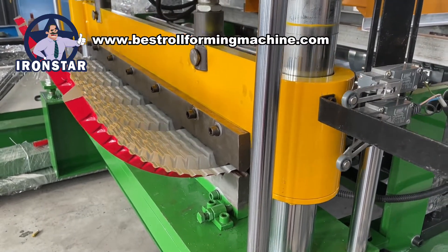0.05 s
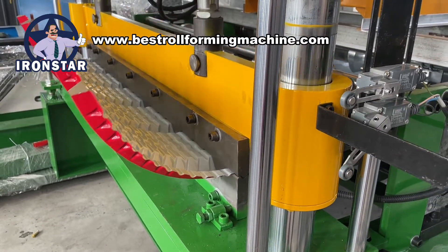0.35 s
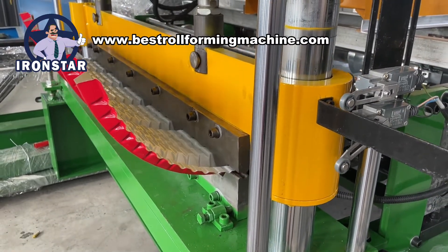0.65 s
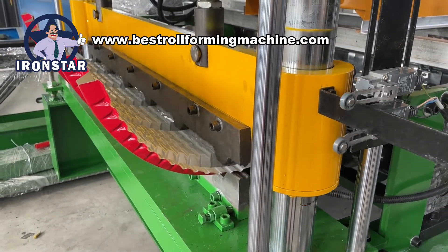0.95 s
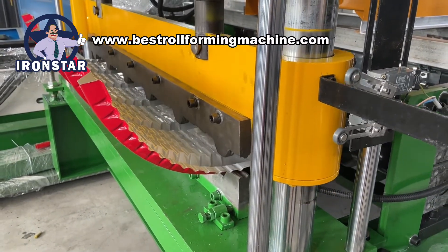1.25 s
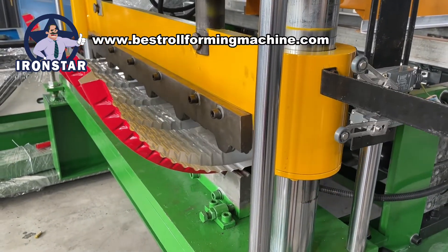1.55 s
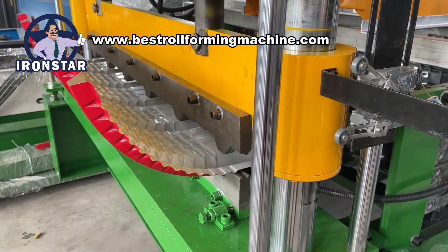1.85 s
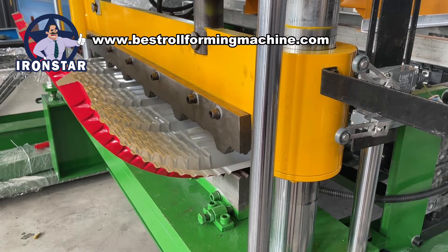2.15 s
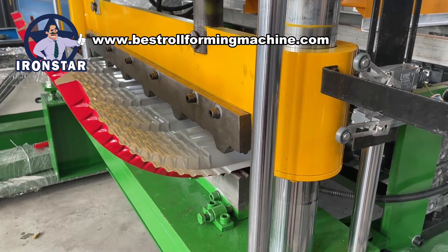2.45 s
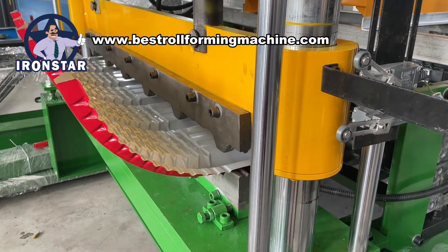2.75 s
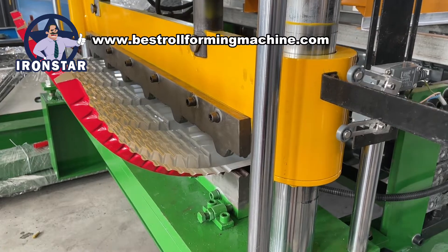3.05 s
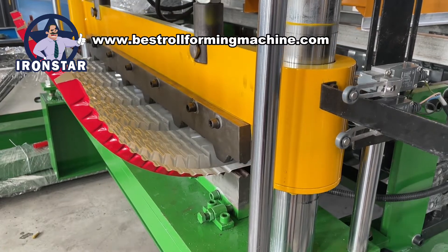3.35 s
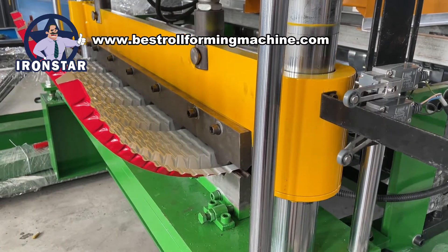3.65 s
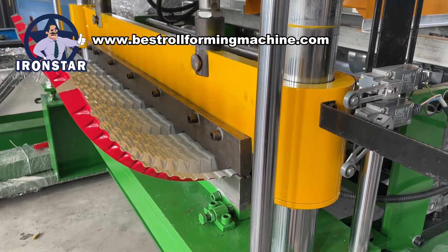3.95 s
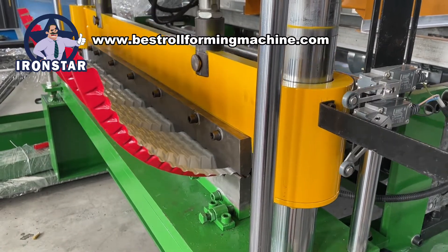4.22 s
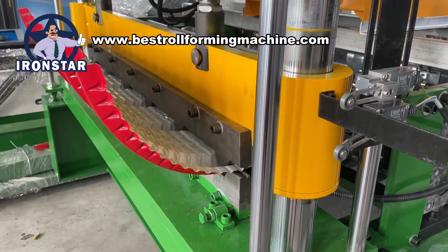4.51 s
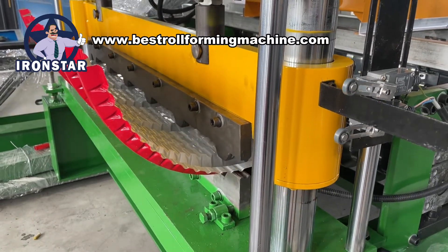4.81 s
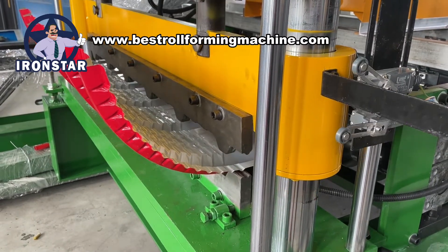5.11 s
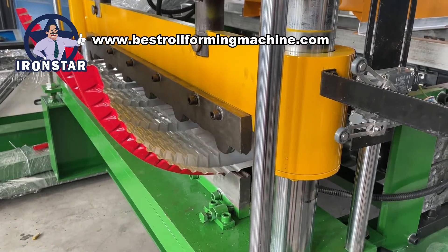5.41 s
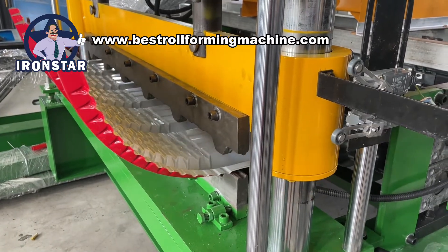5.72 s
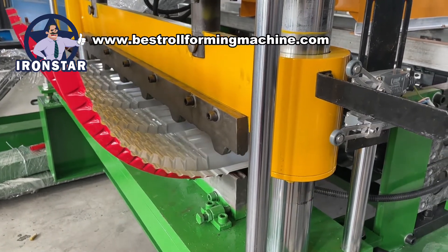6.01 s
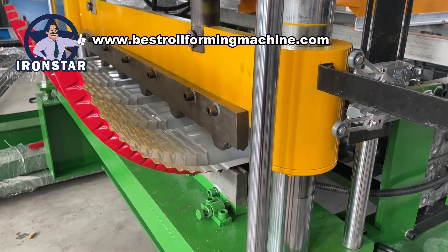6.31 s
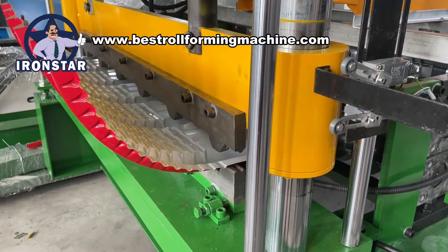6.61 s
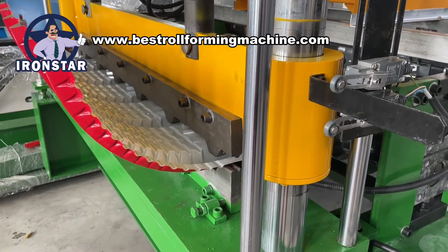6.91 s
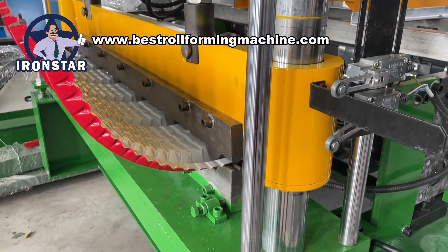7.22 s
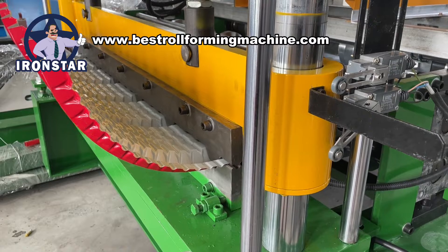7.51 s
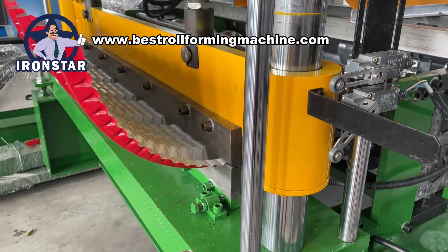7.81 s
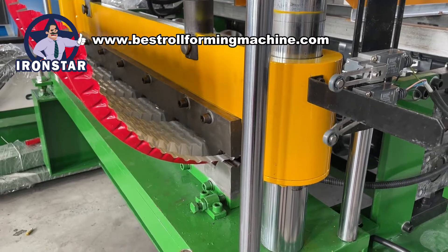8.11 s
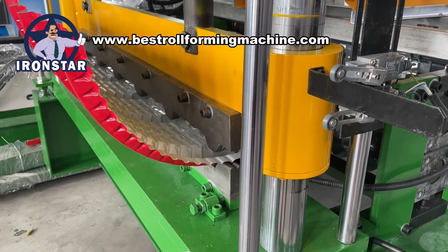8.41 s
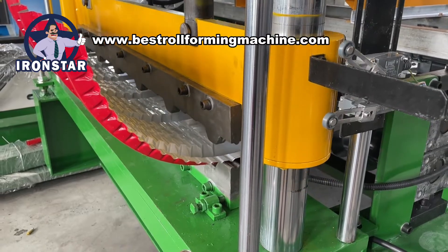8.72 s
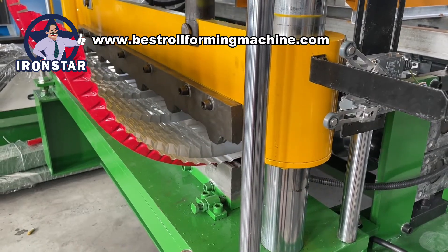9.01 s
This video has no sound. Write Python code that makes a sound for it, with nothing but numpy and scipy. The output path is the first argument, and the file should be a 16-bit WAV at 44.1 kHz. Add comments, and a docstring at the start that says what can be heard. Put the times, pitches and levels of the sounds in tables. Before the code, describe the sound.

A hydraulic press runs close by in a factory hall, its pump whining over steady hiss, rumble and low thuds. It starts mid-stroke: a switch clicks, a steel sheet scrapes, and at about 0.5 seconds the frame clunks with a squeak and a sharp snap. The ram shudders upward while the whine sags, then stops with a clunk at 1.5 seconds under a faint high whistle. Another clunk near 2.9 seconds starts the next descent. The whine swells, the sheet scrapes, and a clunk and quick snaps come around 4.2 seconds. The lift ends with a clunk at 5.2 seconds, followed by one ringing steel clink at 5.6 and the faint whistle. The last stroke begins with a clunk at 6.5 seconds, crimps at 7.8 and stops at 8.8. Small switch clicks mark each movement, and the knocks echo faintly.

```python
"""A hydraulic press crimps a steel roof sheet in a factory hall, close by, over hiss and low thuds.
It opens mid-stroke, the gear pump whining as the ram comes down. A limit switch clicks, the die
squeezes, and the sheet scrapes and snaps. With a squeak the frame clunks as the ram reverses, and it
shudders on the lift while the whine sags with the oil pressure. Another clunk, and the ram rests under
a faint high whistle. Two full strokes follow, with one ringing clink of steel in the rest between them."""
import sys
import numpy as np
from scipy import signal
from scipy.fft import rfft, irfft, next_fast_len
from scipy.io import wavfile

SR = 44100
rng = np.random.default_rng(int(sys.argv[2]) if len(sys.argv) > 2 else 0)


def master_out(mix):
    """Clip the mix to full scale and print it as 16-bit PCM to the path in sys.argv[1]."""
    frames = np.transpose(np.atleast_2d(mix))
    ceiling = np.clip(frames, -1, 1)
    pcm = np.round(ceiling * 32767).astype(np.int16)
    wavfile.write(sys.argv[1], SR, pcm)


N = 399546

# The ram's cue list, a clunk at each change. Each row: start in seconds, motion that follows,
# clatter level in dB, attack in seconds, brightness in dB per octave, ring level in dB.
RAM_CUES = [(.466, "lift", -11, 0.022, 3, -17.5), (1.473, "idle", -17, 0.0051, 2.5, -43),
            (2.866, "down", -18, 0.012, 3.5, -32.5), (4.162, "lift", -13.5, 0.0085, 1.9, -18.5),
            (5.163, "idle", -17.5, 0.0064, 3, -45), (6.468, "down", -18, 0.0062, 3.5, -31),
            (7.759, "lift", -15, 0.012, 1.5, -19.5), (8.765, "idle", -17, 0.0071, 2.5, -43)]
# Stereo image. Each row: frequency in Hz, likeness of left and right (1 alike, -1 or less opposed).
STEREO_LIKENESS = [(150, 0.94), (350, 0.95), (700, 0.68), (1400, 0.54), (2400, 0.22), (4400, 0.49),
                   (6700, 0.33), (7500, -0.72), (8200, -1.11), (8950, -0.58), (10000, 0.13), (11500, 0.78),
                   (13300, 0.55), (14400, -1)]


def amp(db):
    """Decibels to gain."""
    return 10 ** (np.asarray(db) / 20)


def unit(x):
    """Scales to rms 1."""
    return x / np.sqrt(np.mean(x ** 2) + 1e-20)


def curve_at(points, hz):
    """Reads a curve on a log-frequency axis."""
    f, value = np.transpose(points)
    return np.interp(np.log(hz + 1), np.log(f), value)


def add(mix, s, sound):
    """Mixes a sound in at time s."""
    part = mix[:, max(round(s * SR), 0):][:, :sound.shape[-1]]
    part += sound[..., :part.shape[1]]


def ramp(s, length):
    """Rises from 0 to 1, starting at time s."""
    return np.clip((np.arange(N) / SR - s) / length, 0, 1)


def bump(s, length):
    """A smooth swell of height 1 around time s."""
    return np.exp(-((np.arange(N) / SR - s) / length) ** 2)


def drift(rate_hz):
    """A random wander of rms 1."""
    t = np.arange(N) / SR
    knots = rng.standard_normal(N // 100)
    return unit(np.interp(t * rate_hz, np.arange(len(knots)), knots))


def noise(colour, size, tilt_db=0, shape=1):
    """Coloured stereo noise of rms 1, tilted per octave; shape is the envelope of what excites it."""
    hz = np.fft.rfftfreq(size, 1 / SR)
    mid, side = rfft(rng.standard_normal((2, size)) * shape)
    likeness = np.clip(curve_at(STEREO_LIKENESS, hz), -1, 1)
    mid, side = mid * np.sqrt(1 + likeness), side * np.sqrt(1 - likeness)
    octaves = np.log2(np.maximum(hz, colour[0][0]) / colour[0][0])
    gain = amp(curve_at(colour, hz) + tilt_db * octaves)
    sub_cut = hz ** 2 / (hz ** 2 + 30 ** 2)
    return unit(irfft(np.array([mid + side, mid - side]) * gain * sub_cut, size))


def add_click(mix, s, db, colour, decay_s):
    """Mixes in a brief jolt, heard through the resonances of a part."""
    t = np.arange(-SR // 20, SR // 20) / SR
    jolt = (t >= 0) * np.exp(-abs(t) / decay_s)
    add(mix, s + t[0], amp(db) * np.sqrt(np.mean(jolt ** 2)) * noise(colour, len(t), shape=jolt))


def hall(x):
    """The diffuse echo of the factory; its treble dies first."""
    # Each row: frequency in Hz, reverb time (T60) in seconds.
    decay = [(1500, 0.71), (10000, 0.35)]
    t = np.arange(SR // 2) / SR
    hz, age, spectra = signal.stft(rng.standard_normal((2, len(t))) * (t > .006), SR, nperseg=256)
    tail = signal.istft(spectra * amp(-60 * age / curve_at(decay, hz)[:, None]), SR, nperseg=256)[1]
    return signal.oaconvolve(x, tail / np.linalg.norm(tail[0]), axes=1)[:, :N]


def hiss(level_db=-33.5, flicker_db=1.0, fizz_floor_db=-55.5, fizz_fade_s=0.032):
    """A bed of hall noise and rushing oil, with a fine fizz that comes and goes."""
    # EQ of the bed and of the fizz. Each row: frequency in Hz, gain in dB.
    bed_eq = [(30, -28), (70, -3.5), (330, 5.5), (450, -4.5), (750, -8.5), (1250, -7.5), (1480, -21.5),
              (2500, -13), (4300, -16.5), (6500, -16.5), (8000, -21), (9500, -29.5), (13000, -41.5),
              (15700, -27)]
    fizz_eq = [(5000, -1), (8000, -3), (12800, -9), (14500, -13)]
    # Each row: start in seconds, end in seconds, level in dB.
    fizz_spells = [(-.1, 0.135, -45.5), (0.498, 1.246, -45.5), (1.25, 2.65, -49), (2.654, 3.196, -46.5),
                   (7.517, 9.2, -46)]
    size = next_fast_len(N)
    fizz_power = amp(fizz_floor_db) ** 2
    for start, end, db in fizz_spells:
        fizz_power += amp(db) ** 2 * (ramp(start, fizz_fade_s) - ramp(end, fizz_fade_s))
    bed = amp(level_db + flicker_db * drift(40)) * noise(bed_eq, size)[:, :N]
    return bed + np.sqrt(fizz_power) * noise(fizz_eq, size)[:, :N]


def motor(waver=0.17):
    """The motor hums and its drive whistles thinly, each tone wavering a little."""
    # Each row: pitch in Hz, level in dB.
    tones = [(97, -41.5), (186, -43), (5802, -60), (6172, -60.5)]
    out, t = np.zeros((2, N)), np.arange(N) / SR
    for channel in out:
        for hz, db in tones:
            level = np.sqrt(2) * amp(db) * (1 + waver * drift(13))
            channel += level * np.sin(2 * np.pi * hz * t + waver * drift(8.8))
    return out


def rumble(load, lumpy_db=2.0, roll_rise_s=0.077, spread_rad=0.24):
    """Lumpy low end that grows while the ram moves, with rolls that die away and short dull thuds."""
    # Each row: frequency in Hz, gain in dB.
    rumble_eq = [(20, -34), (38, -10), (58, 2), (95, 1), (135, -5.5), (200, -9), (290, -20), (450, -34),
                 (900, -62)]
    # The steady level in dB with the ram idle, going down and lifting.
    floor_db = [-45, -31, -35]
    # Each row: crest time in seconds, level in dB, fade in seconds.
    rolls = [(.17, -19, 0.074), (1.4, -27, 0.36), (2.42, -19.5, 0.17), (2.94, -17, 0.078),
             (3.53, -29, 0.14), (4.33, -15.5, 0.18), (5.27, -22, 0.36), (6.52, -22.5, 0.24),
             (7.74, -16.5, 0.32), (8.15, -25.5, 0.37), (8.6, -24, 0.83)]
    # Each row: centre time in seconds, peak in dB, pitch in Hz, length in seconds.
    thuds = [(0.132, -10.5, 70, 0.02), (0.185, -10.5, 105, 0.025), (2.398, -4.5, 120, 0.0076),
             (2.412, -14.5, 212, 0.023), (2.43, -5.5, 70, 0.03), (2.756, -13.5, 78, 0.018),
             (2.895, -9.5, 88, 0.012), (4.335, -19, 229, 0.013), (4.49, -11, 61.8, 0.022),
             (5.683, -13, 58.5, 0.031), (5.924, -20, 96, 0.027), (6.504, -8, 89, 0.014),
             (7.748, -13, 60, 0.022), (8.265, -12, 74.8, 0.013), (8.608, -8, 80, 0.014)]
    power = amp(np.interp(load, range(3), floor_db)) ** 2
    for s, db, fade in rolls:
        age = np.arange(N) / SR - s
        power += (amp(db) * np.exp(-np.where(age < 0, (age / roll_rise_s) ** 2, age / fade))) ** 2
    out = np.sqrt(power) * amp(lumpy_db * drift(25)) * noise(rumble_eq, next_fast_len(N))[:, :N]
    t = np.arange(-SR // 10, SR // 10) / SR
    for s, db, hz, length in thuds:
        swing = np.sin(2 * np.pi * hz * t + np.array([[spread_rad], [-spread_rad]]))
        add(out, s + t[0], amp(db) * swing / np.cosh(3.4 * t / length))
    return out


def limit_switches(press_db=-20, release_db=-23.3, lever_db=-23):
    """A spring contact snaps over as the ram passes; on release its roller lever rings briefly too."""
    # Each row: time in seconds, what the ram does to the roller.
    trips = [(0.087, "press"), (0.9167, "release"), (1.43, "press"), (3.113, "release"), (3.785, "press"),
             (4.607, "release"), (5.12, "press"), (6.711, "release"), (7.3856, "press"),
             (8.2044, "release"), (8.7203, "press")]
    # Resonances of contact and lever. Each row: frequency in Hz, gain in dB.
    contact_eq = [(1000, -17), (2600, -0.5), (6500, -8), (7800, 4.5), (8900, 12.5), (9900, -1),
                  (12800, -16), (14000, -3), (15700, -6)]
    lever_eq = [(2300, -24), (3100, -11), (3480, 0), (3950, -10), (4800, -12), (7500, -19)]
    out = np.zeros((2, N))
    for s, action in trips:
        add_click(out, s, press_db if action == "press" else release_db, contact_eq, decay_s=0.0034)
        if action == "release":
            add_click(out, s, lever_db, lever_eq, decay_s=0.0045)
    return out


def clink(start_s=5.551, attack_s=0.0018, chatter_db=3.5, chatter_rad=1.1):
    """Struck steel rings in a few modes, chattering against its support."""
    # Each row: pitch in Hz, level in dB, ring time (T60) in seconds.
    modes = [(2900, -30.5, 0.35), (3950, -50, 0.7), (4640, -38, 0.45), (6460, -33.5, 0.39)]
    age = np.maximum(np.arange(N) / SR - start_s, 0)
    ring = np.zeros((2, N))
    for hz, db, t60 in modes:
        level = amp(db - 60 * age / t60 + chatter_db * drift(200))
        phase = 2 * np.pi * (hz * age + rng.random((2, 1)) / 3)
        ring += level * np.sin(phase + chatter_rad * drift(130))
    return ramp(start_s, attack_s) * ring


def squeaks():
    """Brief narrow-band squeaks and groans near clunks and clink; a faint long whistle at rest."""
    # Each row: crest time in seconds, level in dB, pitch in Hz, swell in seconds, band width in Hz.
    cues = [(.447, -33, 1800, 0.05, 900), (0.501, -16.5, 1340, 0.015, 450), (1.463, -41, 2980, 0.016, 350),
            (1.958, -47.5, 4040, 0.53, 90), (4.169, -33.5, 1510, 0.023, 500),
            (4.215, -31.5, 2940, 0.015, 710), (5.15, -36, 2930, 0.012, 358),
            (5.607, -36.5, 1250, 0.034, 300), (5.665, -49, 3950, 0.62, 69.7),
            (7.772, -32, 1480, 0.021, 307), (8.753, -35, 2900, 0.0083, 302)]
    out, t = np.zeros((2, N)), np.arange(-SR // 2, SR // 2) / SR
    for s, db, hz, length, width in cues:
        skirt = 1 + width / hz
        band = [(hz / skirt ** 4, -70), (hz / skirt, -12), (hz, 0),
                (hz * skirt, -12), (hz * skirt ** 4, -70)]
        swell = np.exp(-(np.where(t < 0, t, 2 * t) / length) ** 2)  # dies twice as fast as it rises
        add(out, s + t[0], amp(db) * noise(band, len(t)) * swell)
    return out


def sheet(scrape_attack_s=0.006, grain_db=1.9):
    """Thin steel snaps as it creases, clacks loosely on the die, and scrapes in grainy bursts."""
    # Each row: time in seconds, level in dB.
    snaps = [(.5198, -12.5), (4.196, -19), (4.218, -21), (4.2305, -24), (4.2397, -17.5), (5.192, -23),
             (7.795, -22), (7.8163, -19), (7.8298, -21), (7.838, -19), (8.8265, -21.5), (8.9415, -25)]
    clacks = [(.496, -27), (.63, -26), (1.536, -26), (4.204, -22), (4.316, -25), (5.223, -27), (5.551, -26),
              (6.5656, -29), (7.916, -25)]
    # Each row: start in seconds, level in dB, length in seconds, brightness in dB per octave.
    scrapes = [(0.063, -28, 0.12, -10), (0.23, -30.5, 0.081, -5.5), (0.29, -34, 0.048, -3),
               (0.511, -33, 0.06, 0.5), (3.765, -25, 0.068, -10), (3.923, -31.5, 0.089, -7),
               (4.175, -34, 0.09, -0.5), (5.544, -33.5, 0.13, -0.5), (7.369, -29, 0.086, -9),
               (7.523, -30, 0.072, -7), (7.784, -30, 0.05, -1.5), (8.823, -38.5, 0.054, 4)]
    # The tone of each. Each row: frequency in Hz, gain in dB.
    snap_eq = [(1000, -17), (3600, -14), (4600, 6), (6200, 2), (7500, -19), (15000, -15)]
    clack_eq = [(2000, -1), (6500, 2.5), (8000, -7), (15000, -20)]
    scrape_eq = [(200, -13), (500, -0.5), (1500, 5.5), (3000, 7), (6500, 6), (9000, 3), (14000, -16)]
    hits, scraping, t = np.zeros((2, N)), np.zeros((2, N)), np.arange(SR // 2) / SR
    for s, db in snaps:
        add_click(hits, s, db, snap_eq, decay_s=0.0009)
    for s, db in clacks:
        add_click(hits, s, db, clack_eq, decay_s=0.0048)
    grain = amp(grain_db * drift(300))
    for s, db, length, tilt_db in scrapes:
        burst = np.minimum(t / scrape_attack_s, 1) / (1 + (t / length) ** 2)
        add(scraping, s, amp(db) * noise(scrape_eq, len(t), tilt_db) * burst)
    return hits + grain * scraping


def frame_clunks(hold_s=0.0013, detune=0.0137, lag_s=0.0028):
    """A pressure surge jolts the frame: a clatter whose treble dies first, then the heavy modes bloom."""
    # Each row: frequency in Hz, gain in dB.
    clatter_eq = [(60, -9), (130, 6), (200, 2.5), (370, 7), (460, -0.5), (560, 5.5), (680, -5.5),
                  (1050, -9), (1500, -16.5), (1900, -22.5), (3500, -32), (7000, -36), (12000, -53)]
    # Each row: frequency in Hz, decay time (T60) in seconds.
    clatter_decay = [(100, 1), (300, 0.64), (600, 0.26), (1500, 0.23), (6000, 0.19)]
    # Each row: pitch in Hz, relative level in dB, ring time (T60) in seconds.
    frame_modes = [(169.2, 4, 0.54), (183.6, 4, 0.65), (201.7, 1, 0.76), (235.3, 3, 0.25),
                   (350.3, -3, 0.99), (521, 2, 0.054), (823, -11.5, 0.28), (1417, -8.5, 0.16)]
    # The oil line rings as the ram stops: pitch in Hz, level in dB, ring time (T60) in seconds.
    oil_line = (347, -17, 0.74)
    line_hz, line_db, line_t60 = oil_line
    out, t = np.zeros((2, N)), np.arange(SR // 2) / SR
    for s, motion, db, attack, tilt_db, ring_db in RAM_CUES:
        hz, age, spectra = signal.stft(noise(clatter_eq, len(t), tilt_db), SR, nperseg=256)
        spectra *= amp(-60 * np.maximum(age - attack - hold_s, 0) / curve_at(clatter_decay, hz)[:, None])
        clatter = signal.istft(spectra, SR, nperseg=256)[1][:, :len(t)] * np.minimum(t / attack, 1)
        ring_age = np.maximum(t - attack - lag_s, 0)
        ring = np.zeros(len(t))
        for mode_hz, mode_db, t60 in frame_modes:
            cycles = mode_hz * (1 + detune * rng.standard_normal()) * t + rng.random()
            ring += amp(mode_db - 60 * ring_age / t60) * np.sin(2 * np.pi * cycles)
        add(out, s, amp(db) * clatter + amp(ring_db) * ring * np.clip((t - lag_s) / attack, 0, 1))
        if motion == "idle":
            line_ring = amp(line_db - 60 * t / line_t60) * np.sin(2 * np.pi * line_hz * t)
            add(out, s, line_ring * np.minimum(t / (attack + lag_s), 1))
    return out


def press_cycle(touch_lead_s=0.23, surge_s=0.062, shudder_hold_s=0.12):
    """The ram's work drives the pump: load, shaft slowing, and swells of tooth tone, shudder and whine."""
    # Each row is a stroke: the tooth tone's swell going down, surge on the sheet and sag on the lift
    # in dB, shudder in dB, its fade in dB per second, swell of the high whine in dB.
    strokes = [(3, 3, 2, 19, 14, 8), (-1, 7.5, 6, 15.5, 25, 9), (4.5, 2, 10.5, 12.5, 18, 6.5)]
    # The pump's load state in each motion: 0 idle, 1 down, 2 lift.
    load_of = {"idle": 0, "down": 1, "lift": 2}
    # The seconds the valves take to shift into idle and into down.
    valve_shift_s = {"idle": 0.0997, "down": 0.037}
    t = np.arange(N) / SR
    load = np.full(N, float(load_of["down"]))
    slowing, tooth_db, shudder_db, squeeze_db = np.zeros((4, N))
    upcoming, began = iter(strokes), -1
    for s, motion, *_ in RAM_CUES:
        if motion == "lift":  # the die bottoms at s
            down_db, surge_db, sag_db, shake_db, fade, whine_db = next(upcoming)
            touch = s - touch_lead_s  # the die meets the sheet
            pressure = ramp(s - .34, length=.3)
            load += pressure * (load_of[motion] - load)
            slowing += .017 * bump(s - .016, length=.035)
            squeeze_db += whine_db * bump(s - .073, length=.096)
            tooth_db += down_db * np.sin(np.pi * ramp(began, touch - began))
            tooth_db += surge_db * (bump(touch, surge_s) + bump(s - .028, surge_s))
            tooth_db -= sag_db * bump(s + .36, length=.35)
            faded_db = fade * np.maximum(t - s - shudder_hold_s, 0)
            shudder_db += ramp(s, length=.22) * np.maximum(shake_db - faded_db, 0)
        else:
            shifted = ramp(s, valve_shift_s[motion])
            load += shifted * (load_of[motion] - load)
            shudder_db *= 1 - shifted
            began = s
    return load, slowing, tooth_db, shudder_db, squeeze_db


def gear_mesh(hz, teeth, whine_order, chirp_rad=0.85):
    """Teeth mesh unevenly within a turn; gives the left and right phase of every shaft order."""
    phase = 2 * np.pi * rng.random(len(hz))
    # side tones bend the pitch of the tooth tone and leave it solid
    for step in 1, 2:
        phase[teeth + step] = 2 * phase[teeth] - phase[teeth - step] + np.pi
    # near its octave they add up almost in step: a throb once a turn
    steps, centre = np.arange(-2, 3), 2 * teeth - 1
    phase[centre + steps] = phase[centre] + steps * phase[0] - chirp_rad / 2 * steps ** 2
    # the high whine chirps upward once a turn
    steps = np.arange(-3, 4)
    phase[whine_order + steps] = phase[whine_order] - chirp_rad * steps ** 2
    spread = np.arccos(np.clip(curve_at(STEREO_LIKENESS, hz), -1, 1)) / 2 * rng.choice([-1, 1], len(hz))
    return phase + np.array([spread, -spread])


def gear_pump(load, slowing, tooth_db, shudder_db, squeeze_db, trim_db=-3.0):
    """The pump sings in orders, multiples of its shaft speed; load slows it and shifts their balance."""
    # Shaft speed in Hz with the ram idle, going down and lifting.
    shaft_hz = [24.883, 24.794, 24.592]
    # The orders that stand out, as multiples of the shaft speed.
    strong_orders = [10, 12, 13, 14, 15, 23, 24, 25, 26, 27, 28, 38, 39, 41, 48, 49, 50, 51, 52, 53, 91]
    # Each row is one of those orders: relative level in dB when idle, going down, lifting.
    strong_db = [(-69, -57, -39), (-46, -37.5, -42), (-35.5, -25.5, -24), (-34.5, -30.5, -32),
                 (-42.5, -40, -39), (-57, -45.5, -40.5), (-50.5, -54, -42), (-70, -46.5, -36.5),
                 (-52.5, -39, -38.5), (-46, -44, -42.5), (-50.5, -44, -44), (-65, -69, -46.5),
                 (-55.5, -56, -43.5), (-65, -53, -48.5), (-66, -46, -48.5), (-51.5, -43.5, -80),
                 (-65, -49, -43), (-60, -50, -40), (-54, -59, -41), (-74, -62, -54), (-81, -60, -45)]
    # The buzz of weak orders between them. Each row: frequency in Hz, relative level in dB.
    buzz = [(100, -45), (200, -54.5), (480, -59), (750, -53), (1100, -77), (1500, -62), (2200, -63),
            (3000, -70), (7200, -71)]
    teeth, shudder_order, whine_order, top_order = 13, 10, 51, 91  # the frame shudders with one order
    waver_db, rough_db, flutter = .7, 1.5, .14  # unsteadiness with the oil flow
    wobble, scatter_db, side_share, turn_samples = 0.001076, 4.0, 0.47, 4096
    speed = np.interp(load, range(3), shaft_hz) * (1 - slowing + wobble * (drift(14) + .5 * drift(90)))
    turns = np.cumsum(speed) / SR
    order = np.arange(turn_samples // 2 + 1)
    hz = order * shaft_hz[1]
    level_db = curve_at(buzz, hz) + scatter_db * rng.standard_normal((3, len(order)))
    level_db[:, strong_orders] = np.transpose(strong_db)
    gain = amp(level_db) * ((order > 3) & (hz < buzz[-1][0]))
    phase = gear_mesh(hz, teeth, whine_order)
    # Tones that move on their own. Each row: order, swell in dB, unsteadiness in dB.
    solos = [(teeth, tooth_db, waver_db)]
    solos += [(teeth + step, side_share * tooth_db, waver_db) for step in (1, 2)]
    solos += [(shudder_order, shudder_db, waver_db), (top_order, side_share * squeeze_db, waver_db)]
    solos += [(whine_order + step, squeeze_db, rough_db) for step in (-1, 0, 1)]
    out = np.zeros((2, N))
    for k, swell_db, unsteady_db in solos:
        tone_db = np.interp(load, range(3), level_db[:, k]) + swell_db + unsteady_db * drift(45)
        out += np.sqrt(2) * amp(tone_db) * np.cos(2 * np.pi * k * turns + phase[:, k, None])
        gain[:, k] = 0
    # all other orders loop as one shaft turn per load state, crossfaded by the load
    position = turns % 1 * turn_samples
    for state in range(3):
        one_turn = irfft(gain[state] * np.exp(1j * phase)) * turn_samples / np.sqrt(2)
        share = np.maximum(1 - abs(load - state), 0) * (1 + flutter * drift(30))
        out += share * np.array([np.interp(position, np.arange(turn_samples), side) for side in one_turn])
    return amp(trim_db) * out


def scene(hall_db=-16.5):
    """The press close by, its knocks and squeaks echoing faintly in the hall."""
    load, slowing, tooth_db, shudder_db, squeeze_db = press_cycle()
    spots = frame_clunks() + sheet() + clink() + squeaks()
    pump = gear_pump(load, slowing, tooth_db, shudder_db, squeeze_db)
    return pump + motor() + hiss() + rumble(load) + limit_switches() + spots + amp(hall_db) * hall(spots)


def record(dry, balance_db=-0.16, ceiling=0.9, cutoff_hz=16200):
    """Leans the mix slightly right, rounds off the hardest peaks and cuts the very top."""
    leaning = dry * amp([[balance_db], [-balance_db]])
    rounded = leaning / (1 + (leaning / ceiling) ** 6) ** (1 / 6)
    lowpass = signal.firwin(511, cutoff_hz, window=("kaiser", 9), fs=SR)
    return signal.oaconvolve(rounded, lowpass[None], "same")


dry = scene()
out = record(dry)
master_out(out)
```